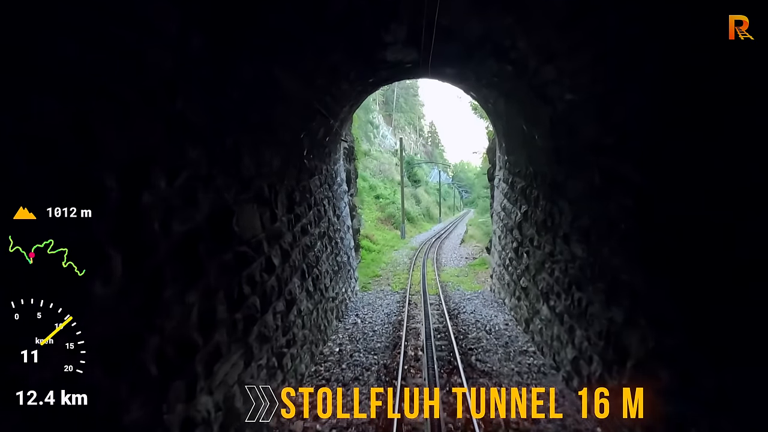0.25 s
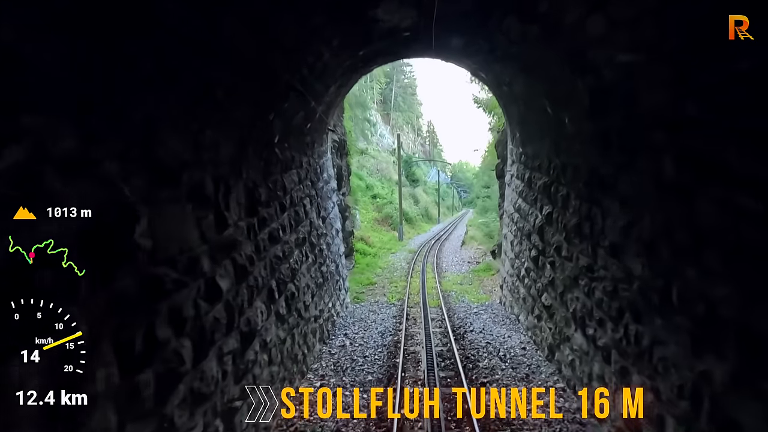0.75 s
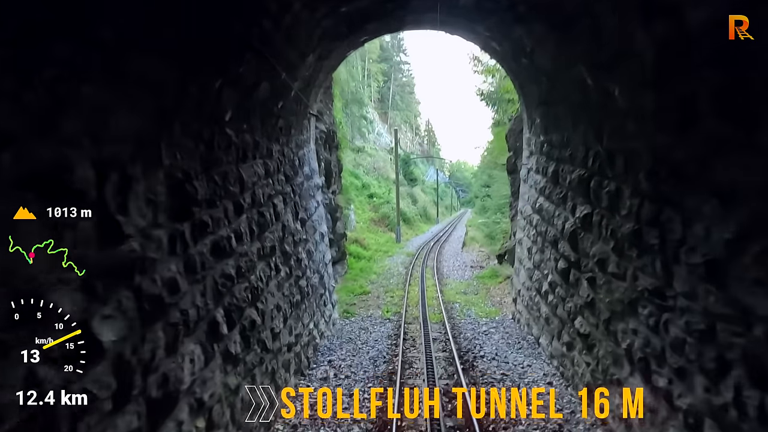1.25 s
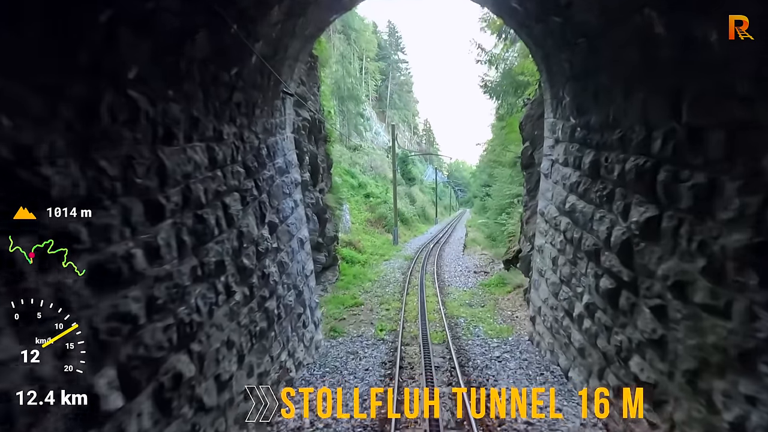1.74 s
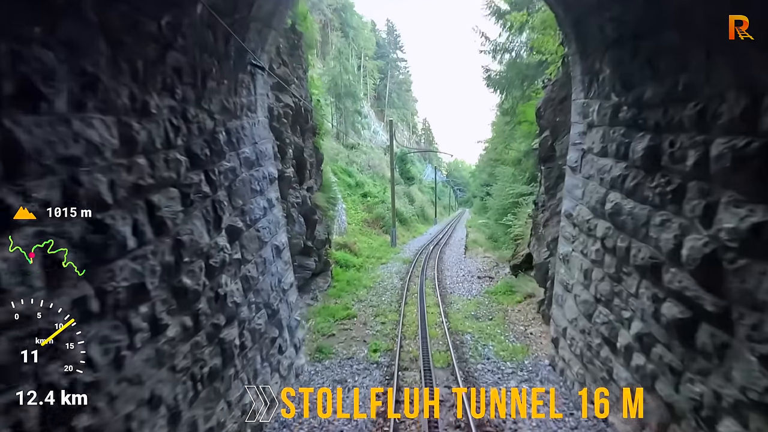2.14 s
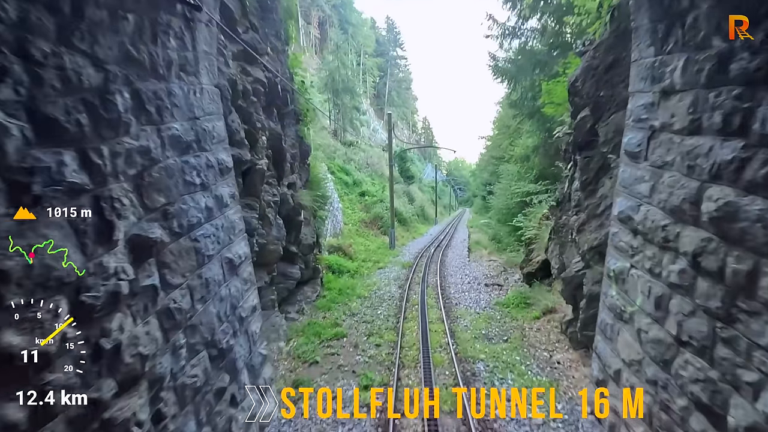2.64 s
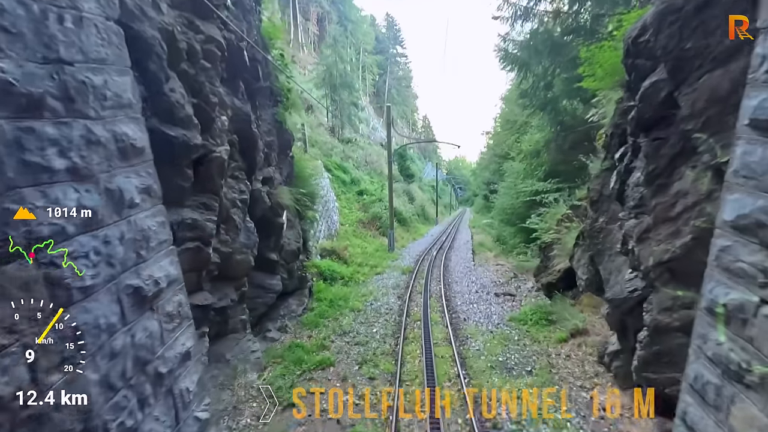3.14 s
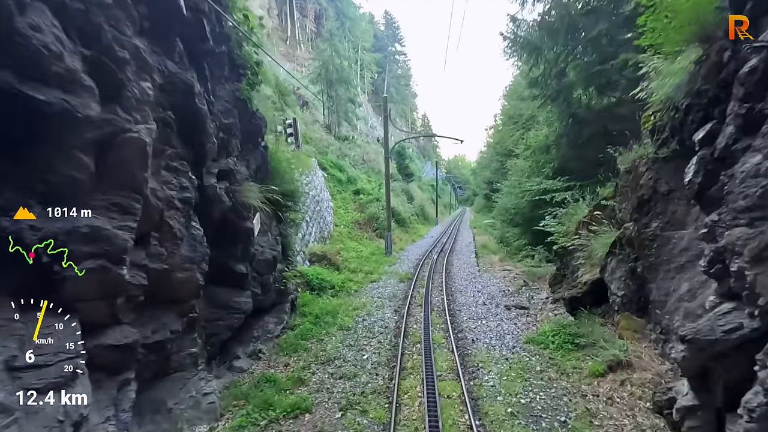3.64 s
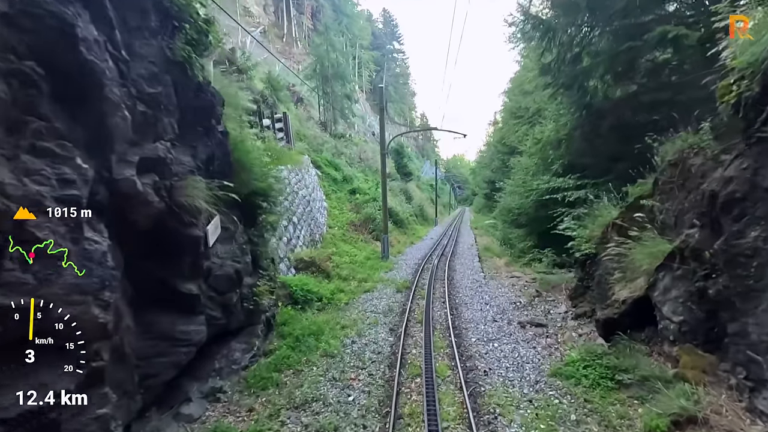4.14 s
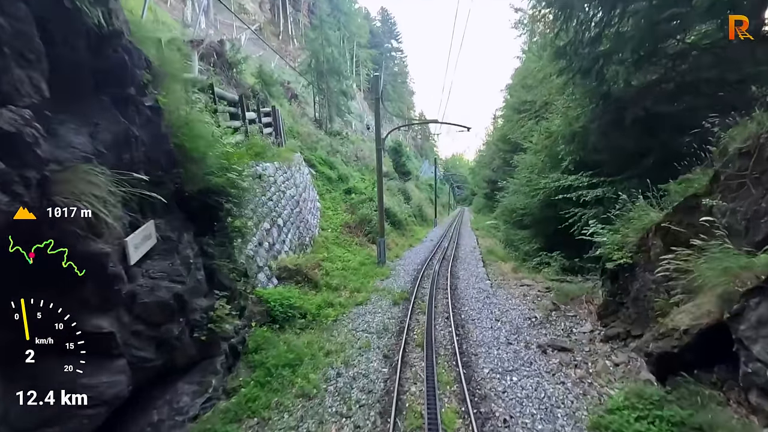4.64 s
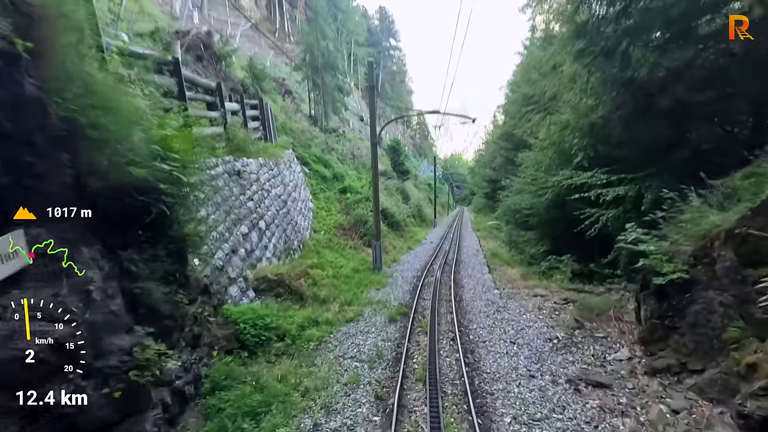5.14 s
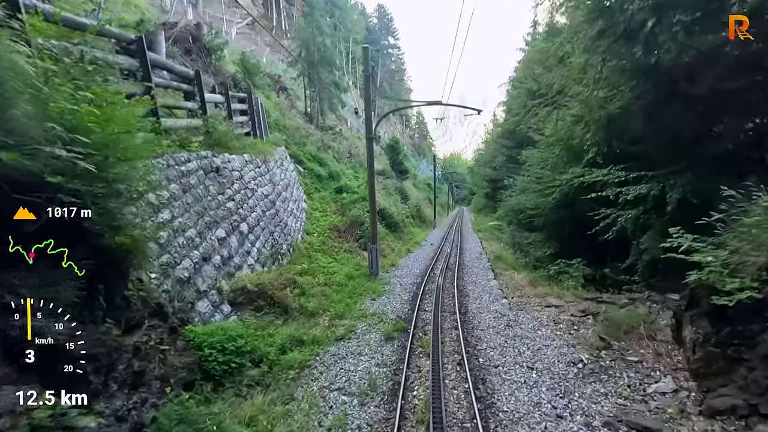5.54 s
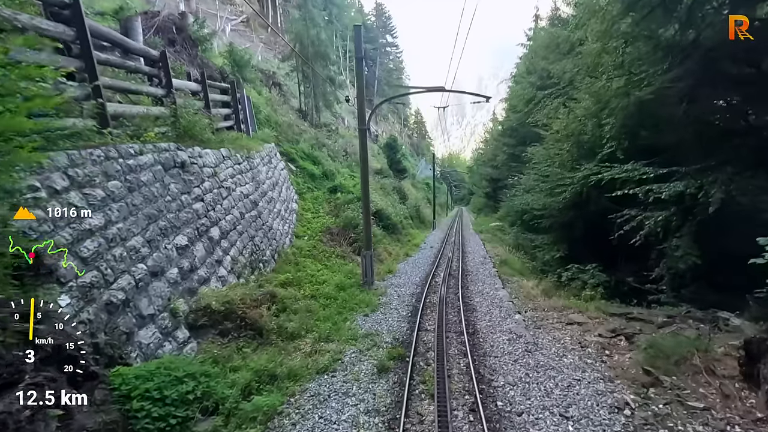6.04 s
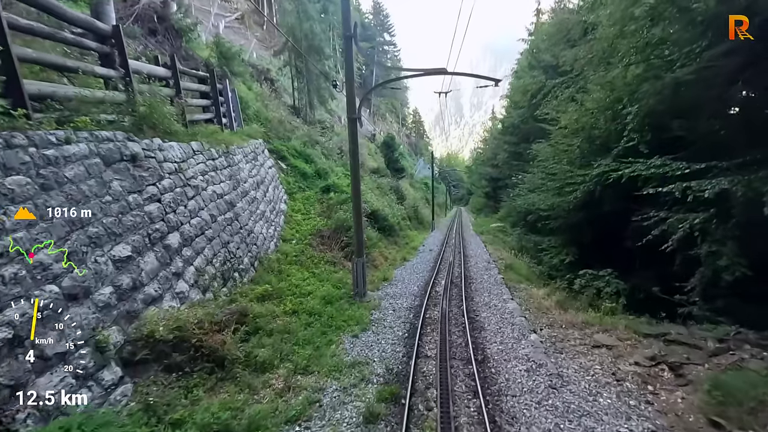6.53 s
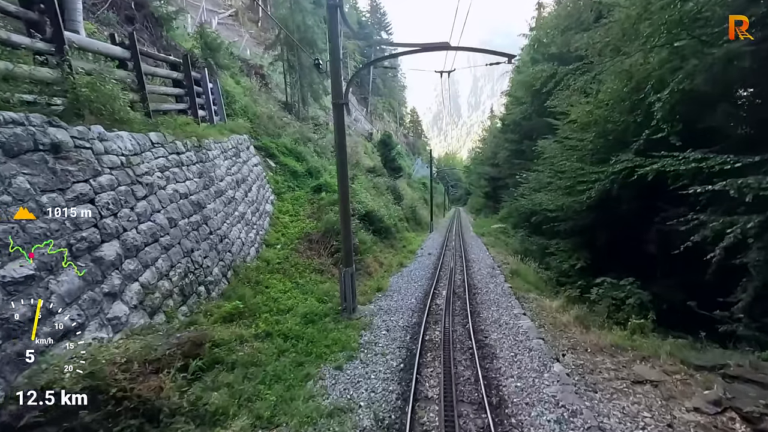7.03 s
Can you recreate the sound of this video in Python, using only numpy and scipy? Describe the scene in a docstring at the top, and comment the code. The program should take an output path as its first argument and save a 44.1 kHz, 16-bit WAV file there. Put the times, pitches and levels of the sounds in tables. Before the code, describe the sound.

Inside a mountain rack railway cab, steady deep humming and wheel rumble carry a faint gear whine, with sharp, bright rattles of loose trim.

```python
"""A low cog drone fills the cab of an electric rack train rolling steadily, microphone inside.
Sine partials of the tooth rate swell once a turn of the cog wheel, over filtered noise for wheel rumble.
A wavering sine is the gear whine; narrow-band noise is the thin motor whistle.
A loose panel in the small cab clicks now and then and shakes in spells of quick rattles: bursts of tiny
impacts ring its modes, crack, and make its edges sizzle."""
import sys
import numpy as np
from scipy import signal
from scipy.fft import rfft, irfft
from scipy.io import wavfile
from scipy.ndimage import uniform_filter1d

SR = 44100
rng = np.random.default_rng(int(sys.argv[2]) if len(sys.argv) > 2 else 0)


def dump(signal):
    """Clip the signal to [-1, 1] and save it as 16-bit WAV at the path in sys.argv[1]."""
    limited = np.clip(np.atleast_2d(signal).T, -1, 1)
    pcm = np.round(limited * 32767).astype(np.int16)
    wavfile.write(sys.argv[1], SR, pcm)


N = 321048

# rolling noise, shape of its spectrum: pitch_hz, relative_density_db (per Hz)
ROLL_SPECTRUM = [(12, -14), (28, -2), (70, 1), (135, 1.5), (260, -2), (450, -6), (720, -15), (1300, -21),
                 (2400, -30.5), (3700, -32.5), (5600, -42.5), (6700, -51.5), (7900, -52), (8600, -61.5),
                 (15500, -62.5)]
# narrow resonances that the running gear keeps ringing: pitch_hz, width_hz, level_db
BODY_RESONANCES = [(33, 1.9, -27.5), (48.4, 6.6, -30.5), (338.4, 14.7, -30.5), (1240, 120, -49.5)]
# gear whine before trim and flutter: time_s, level_db
GEAR_LEVEL = [(0, -37), (.45, -38), (.75, -32.5), (1.15, -31), (1.45, -36), (2.2, -35), (2.4, -26),
              (2.7, -34.5), (3.45, -36), (3.7, -32), (4.3, -33.5), (5.1, -37.5), (7.28, -36.5)]
# motor whistle: time_s, level_db
WHISTLE_LEVEL = [(0, -43.5), (1.5, -47), (2.3, -45.5), (2.8, -46), (4.3, -49), (5.6, -46), (7.28, -45.5)]
# modes the loose panel rings with: pitch_hz, width_hz, relative_level_db
PANEL_MODES = [(788, 55, -2), (1180, 103, -2), (1273, 69, 0.5), (1659, 67, 1), (1766, 63, -1.5),
               (1879, 106, -0.5), (2100, 26, 1.5), (2303, 78, -5.5), (2680, 112, -2.5), (2930, 120, -7.5),
               (3180, 130, -4), (3416, 58, -1.5), (3662, 99, -0.5), (4100, 84, -8), (4396, 82, -4.5),
               (4700, 90, -11), (5200, 64, -10), (5490, 84, -12.5), (5700, 51, -11.5), (6040, 46, -20.5)]
# broad crack of the panel's contacts: pitch_hz, relative_density_db (per Hz)
CRACK_SPECTRUM = [(300, -20.5), (900, -19), (3800, -7.5), (5800, -4.5), (6700, -12.5), (9000, -35.5),
                  (15500, -49)]
# bright sizzle of the panel's edges: pitch_hz, relative_density_db (per Hz)
SIZZLE_SPECTRUM = [(4000, -29), (7000, -5.5), (8300, -1.5), (9100, 2.5), (10800, -1), (12200, -0.5),
                   (12800, -6.5), (14000, -4.5), (15600, -9)]
# borders between the panel's low, middle and high modes: pitch_hz
MODE_BORDERS = [2400, 3900]
# spells of even knocks: start_s, gap_s, knocks (count), loudest_db, fade_db (down at the first knock,
# about half that at the last), length_s (of a knock), sizzle_db (at the loudest point)
RATTLE_SPELLS = [(3.063, .0615, 5, -24.5, 1.5, 0.026, -16.5), (5.029, 0.0649, 5, -22, 3.5, 0.024, -14),
                 (6.629, 0.0772, 4, -21.5, 7, 0.034, -17)]
# single knocks and clicks: start_s, length_s, level_db, dullness_db (lows up, highs down), sizzle_db
SINGLE_CLICKS = [(.376, 0.015, -29.5, 5, -20), (.465, 0.044, -31.5, -1.5, -18),
                 (.579, 0.031, -25.5, 3, -26), (.643, .026, -45, 2, -28), (.82, .015, -39, 3, -19),
                 (1.368, 0.023, -43.5, 1, -17), (1.79, .035, -41, -4, -18), (1.856, 0.017, -31, 0.5, -24),
                 (2.118, 0.057, -39.5, 2, -28), (2.28, 0.024, -30, 0, -17.5),
                 (2.465, 0.033, -35, -2.5, -26), (2.984, 0.017, -27, -3, -21), (3.38, 0.056, -29, 4.5, -14),
                 (3.435, 0.058, -26, -6, -16), (3.62, .014, -31.5, 1, -21), (3.681, .01, -39, 4, -26),
                 (3.998, 0.0067, -29, 1, -19), (4.163, 0.014, -30.5, 3, -22), (4.303, 0.024, -33, 2, -23),
                 (4.358, 0.066, -40, 2, -20), (4.652, 0.0097, -32.5, 0, -24),
                 (4.886, 0.0067, -29.5, 2, -24), (4.932, 0.061, -33, -2, -20), (5.368, 0.054, -29, -4, -13),
                 (6.568, 0.0055, -24.5, -4.5, -21), (6.926, 0.011, -34, 2, -26),
                 (7.11, 0.032, -33.5, -1, -29), (7.226, 0.011, -36.5, 1, -23)]
# cog teeth meeting the rack, before a slight wobble: time_s, tooth_rate_hz
TOOTH_RATE = [(0, 57.77), (2, 58.1), (7.28, 57.99)]
# slow levels of the drone before trims: time_s, tooth_rate_db, second_db, third_db, fourth_db
DRONE_LEVELS = [(0.0, -31, -28, -16, -27), (0.29, -24.5, -16, -36, -23.5), (1.73, -33, -23.5, -18.5, -23.5),
                (2.26, -22.0, -15.5, -36, -18.5), (2.54, -24, -28.5, -17, -23),
                (3.82, -25.5, -17, -21, -24.3), (4.21, -29.5, -36, -19, -20),
                (4.65, -25.5, -29, -28.5, -17), (5.16, -23, -27.5, -18.5, -30.5),
                (5.36, -24, -24, -18.5, -25.5), (6.97, -22.5, -28.5, -21.5, -24),
                (7.28, -31.3, -33.4, -18.3, -20)]
# weaker overtones of the mesh before trim and flutter: multiple (of the tooth rate), level_db
MESH_OVERTONES = [(5, -35), (6, -38.5), (7, -37), (8, -38), (9, -44)]
# swell of each strong partial once a turn: multiple (of the tooth rate), depth_db (up and down), first_crest_s
TURN_SWELLS = [(2, 3.5, 0.89), (3, 1.8, 0.68), (4, 3, 0.62)]

GEAR_HZ = 632.6  # centre of the whine's unsteady pitch
TURN_S = 1.072  # one turn of the cog wheel
ATTACK_S, BUILD_PER_S = 0.0019, 3.7  # a knock's rise time: this attack plus BUILD_PER_S times its length squared
TICKS_PER_S, TICK_S, TICK_DB, TICK_SIZZLE_DB = 2.5, 0.0093, -45.5, -17  # faint ticks at random moments
CLIMAX = 0.65  # a spell is loudest and brightest this share of the way through
SIZZLE_FADE_DB = 6  # loss of sizzle at a spell's first knock, about half that at its last
TOP_HZ = 15600  # the microphone stage passes nothing much above this


def undb(db):
    """Decibels to gain."""
    return 10 ** (np.asarray(db) / 20)


def unit(x):
    """Scale to rms 1."""
    return x / np.sqrt(np.mean(x ** 2))


def curve(table, axis=1):
    """One column of a table, joined by straight lines in time."""
    rows = np.array(table)
    return np.interp(np.arange(N) / SR, rows[:, 0], rows[:, axis])


def walk(rate):
    """Slow chance of rms 1: random levels held 1 / rate s and slewed twice."""
    k = int(SR / rate)
    held = np.repeat(rng.standard_normal(2048)[:N // k + 2], k)
    slewed = uniform_filter1d(uniform_filter1d(held, k), k)
    return unit(slewed[:N])


def colour(x, points):
    """Causal minimum-phase filter with the given (Hz, dB) response, made by folding the cepstrum."""
    hz, db = np.transpose(points)
    f = np.maximum(np.fft.rfftfreq(N, 1 / SR), 1)
    response_db = np.interp(np.log(f), np.log(hz), db)
    cepstrum = irfft(np.log(undb(response_db)), N)
    cepstrum[1:N // 2] *= 2
    cepstrum[N // 2 + 1:] = 0
    return irfft(rfft(x) * np.exp(rfft(cepstrum)), N)


def ring(x, hz, width):
    """One resonance, gain 1 at its centre."""
    return signal.lfilter(*signal.iirpeak(hz, hz / width, fs=SR), x)


def band_noise(hz, width):
    """A resonance shaken at random, filtered twice for steep skirts, rms 1."""
    return unit(ring(ring(rng.standard_normal(N), hz, width), hz, width))


def tone(hz):
    """A sine of rms 1 on a moving pitch."""
    return np.sqrt(2) * np.sin(2 * np.pi * (np.cumsum(hz) / SR + rng.random()))


def rolling(roll_db=-17, grit_db=1.5):
    """Wheels rumble through the car body and ring its resonances; above the rumble the grinding is uneven."""
    noise = unit(colour(rng.standard_normal(N), ROLL_SPECTRUM))
    rumble = signal.sosfiltfilt(signal.butter(2, 700, fs=SR, output="sos"), noise)
    grinding = (noise - rumble) * undb(grit_db * np.tanh(walk(70)))
    resonances = sum(undb(db) * band_noise(hz, width) for hz, width, db in BODY_RESONANCES)
    return undb(roll_db) * (rumble + grinding) + resonances


def drive(gear_db=-1.5, wobble=0.00763, flutter_db=1.5, whistle_hz=3842, whistle_width_hz=72):
    """The reduction gear whines with an unsteady pitch and level; the motor adds an airy whistle."""
    gear_level = undb(curve(GEAR_LEVEL) + gear_db + flutter_db * walk(16))
    gear = gear_level * tone(GEAR_HZ * (1 + wobble * walk(22)))
    whistle = undb(curve(WHISTLE_LEVEL)) * band_noise(whistle_hz, whistle_width_hz)
    return gear + whistle


def knocks(tick_scatter_db=4.5):
    """Every knock, single, in spells or at random: start_s, length_s, level_db, dullness_db, sizzle_db."""
    rows = list(SINGLE_CLICKS)
    for start, gap, count, db, fade_db, length, sizzle_db in RATTLE_SPELLS:
        for k, share in enumerate(np.linspace(0, 1, round(count))):
            away = abs(share / CLIMAX - 1)  # 0 at the climax, 1 at the first knock
            rows.append((start + k * gap, length, db - fade_db * away, 0, sizzle_db - SIZZLE_FADE_DB * away))
    tick_count = round(TICKS_PER_S * N / SR)
    for when, size in rng.random((64, 2))[:tick_count]:
        tick_db = TICK_DB + tick_scatter_db * (2 * size - 1)
        rows.append((when * N / SR, TICK_S, tick_db, 0, TICK_SIZZLE_DB))
    return rows


def shaking(release_s=0.0071, sag_db=0.5, jolt_db=0.2, low_db=-0.5, high_db=0.5, colour_db=2.5, sizzle_power=1.8):
    """Force on low, middle and high modes and edges: each knock builds, sags and dies, with its own colour."""
    t = np.arange(N) / SR
    jolts = undb(jolt_db * np.tanh(walk(160)))  # the bounces within a knock are uneven
    force = np.zeros((4, N))
    tints = 2 * rng.random((128, 4)) - 1
    for (start, length, db, dull_db, sizzle_db), tint in zip(knocks(), tints):
        span = slice(int(start * SR), int((start + length + .1) * SR))
        age = np.maximum(t[span] - start, 0)
        rise = ATTACK_S + BUILD_PER_S * length ** 2
        build = np.minimum(age / rise, 1)
        release = np.exp(-np.maximum(age - length, 0) / release_s)
        sag = undb(sag_db * (.5 - np.clip((age - rise) / length, 0, 1)))  # later bounces are weaker
        shape = build * release * jolts[span] * sag
        ranges_db = np.array([low_db + dull_db, 0, high_db - dull_db, sizzle_db]) + colour_db * tint
        # the power makes the edges favour the hardest bounces
        shapes = np.array([shape, shape, shape, shape ** sizzle_power])
        force[:, span] += undb(db + ranges_db[:, None]) * shapes
    return force


def chatter_level(force, rest_db=-53, stirred_db=-9, settle_s=0.09, flutter_db=5):
    """The fittings chatter faintly all the time; knocks stir them up and they settle again."""
    keep = np.exp(-1 / (settle_s * SR))
    stirring = np.sqrt(signal.lfilter([1 - keep], [1, -keep], force ** 2))
    return (undb(rest_db) + undb(stirred_db) * stirring) * undb(flutter_db * np.tanh(walk(45)))


def contacts(rate=5000):
    """A dense run of tiny impacts, rate per second, at random moments with random sign, rms 1."""
    return unit((rng.random(N) < rate / SR) * rng.choice([-1, 1], N))


def panel(modes_db=14, sizzle_db=1.5, chatter_top_db=-19, contact_db=4):
    """Tiny impacts ring the panel's modes and crack, noise sizzles; faint chatter goes on between knocks."""
    *forces, edge = shaking()
    chatter = chatter_level(np.mean(forces, axis=0))
    forces = np.array(forces) + chatter
    hits = contacts()
    modes = 0
    for k, (hz, width, db) in enumerate(PANEL_MODES):
        # the point of contact moves, so each knock favours other modes
        favour_db = contact_db * np.tanh(walk(25))
        force = forces[np.searchsorted(MODE_BORDERS, hz)] * undb(db + favour_db)
        modes = modes + (-1) ** k * ring(hits * force, hz, width)
    crack = colour(contacts() * forces.mean(axis=0), CRACK_SPECTRUM)
    edge_level = edge + undb(chatter_top_db) * chatter
    sizzle = colour(rng.standard_normal(N) * edge_level, SIZZLE_SPECTRUM)
    return undb(modes_db) * modes + crack + undb(sizzle_db) * sizzle


def cab(x, wet_db=-10, t60_s=.3):
    """The small cab adds a short diffuse tail: noise dying by 60 dB in t60_s, starting after 4 ms."""
    t = np.arange(SR // 2) / SR
    tail = rng.standard_normal(len(t)) * undb(-60 * t / t60_s) * (t > .004)
    return x + undb(wet_db) * signal.fftconvolve(x, tail / np.linalg.norm(tail))[:N]


def rack(tooth_db=-1, drone_db=-1.86, overtone_db=-1.5, wobble=0.002, flutter_db=3, waver_db=0.68):
    """Cog teeth enter the rack: tooth rate, three strong partials swelling once a turn, fluttering overtones."""
    t = np.arange(N) / SR
    hz = curve(TOOTH_RATE) * (1 + wobble * walk(6))
    tooth = undb(tooth_db + curve(DRONE_LEVELS)) * tone(hz)
    drone = 0
    for multiple, depth_db, crest_s in TURN_SWELLS:
        k = round(multiple)  # also the partial's column in the drone table
        swell_db = depth_db * np.cos(2 * np.pi * (t - crest_s) / TURN_S)
        level_db = curve(DRONE_LEVELS, axis=k) + swell_db + waver_db * walk(6.4)
        drone = drone + undb(level_db) * tone(k * hz)
    overtones = sum(undb(db + flutter_db * walk(3.9)) * tone(round(k) * hz) for k, db in MESH_OVERTONES)
    return tooth + undb(drone_db) * drone + undb(overtone_db) * overtones


def scene():
    """Rumble, drive, rattles and drone at one microphone; only the rattles get the cab's tail."""
    return (rolling() + drive() + cab(panel()) + rack())[None]


def record(dry, ceiling=1.18):
    """The microphone stage rounds the highest peaks and cuts the top."""
    rounded = ceiling * np.tanh(dry / ceiling)
    return signal.sosfilt(signal.ellip(10, .1, 80, TOP_HZ, fs=SR, output="sos"), rounded)


dry = scene()
out = record(dry)
dump(out)
```